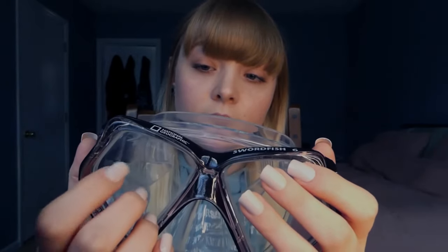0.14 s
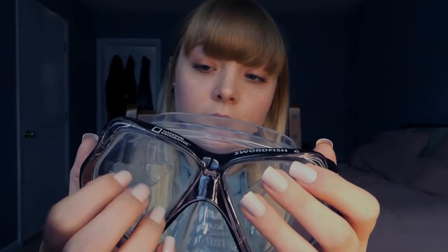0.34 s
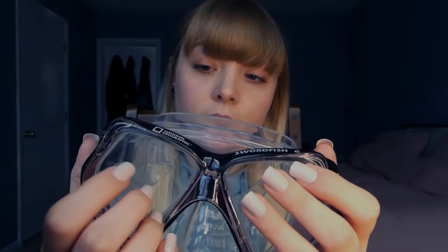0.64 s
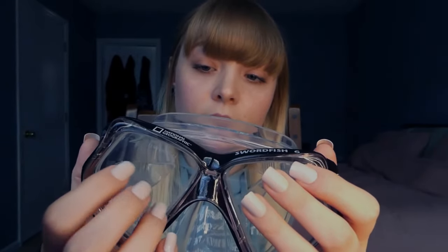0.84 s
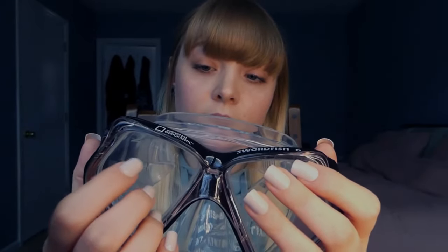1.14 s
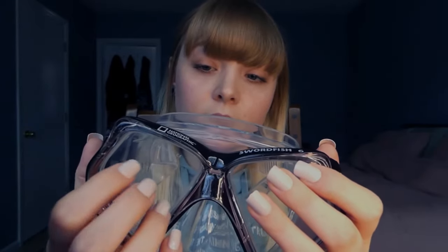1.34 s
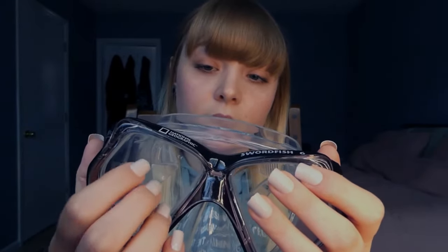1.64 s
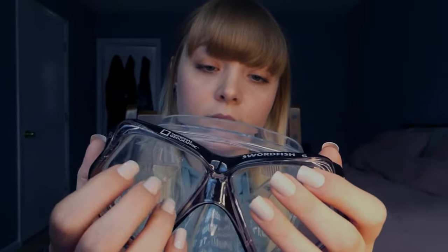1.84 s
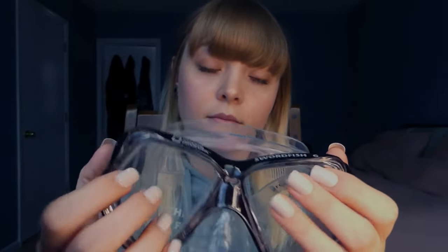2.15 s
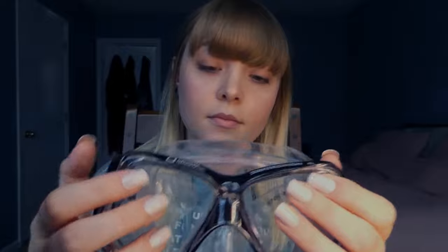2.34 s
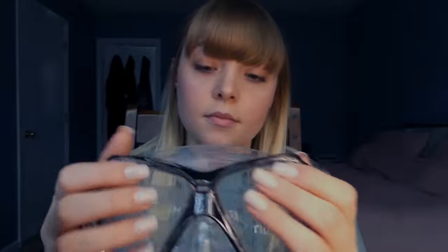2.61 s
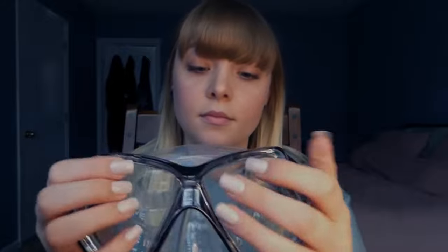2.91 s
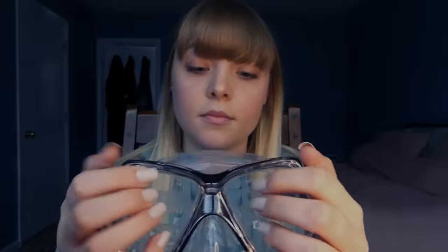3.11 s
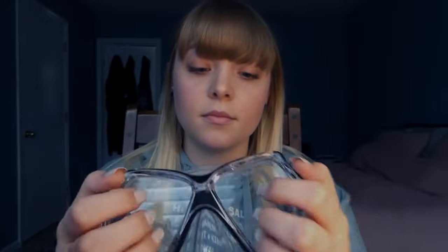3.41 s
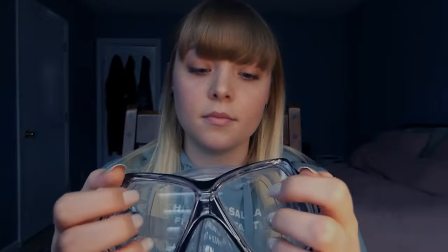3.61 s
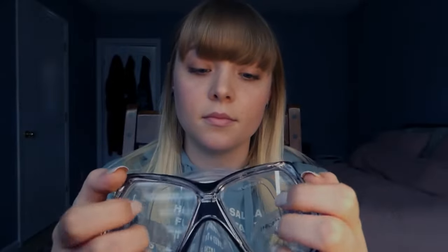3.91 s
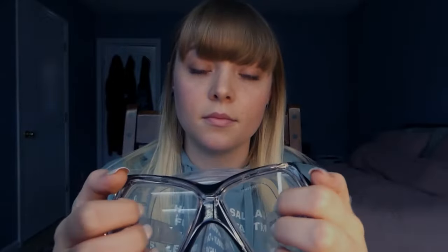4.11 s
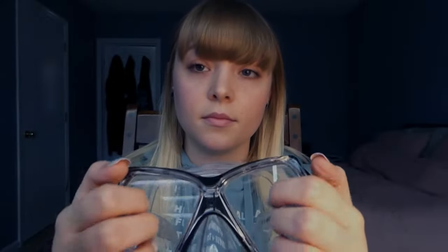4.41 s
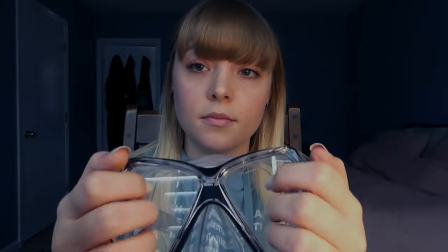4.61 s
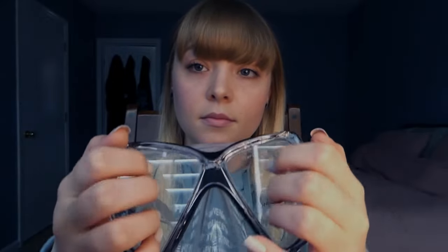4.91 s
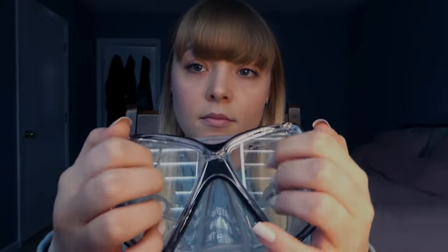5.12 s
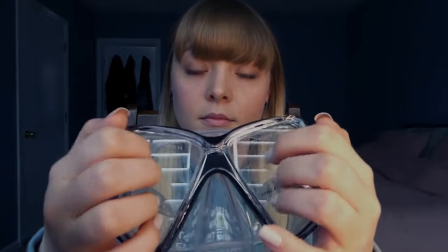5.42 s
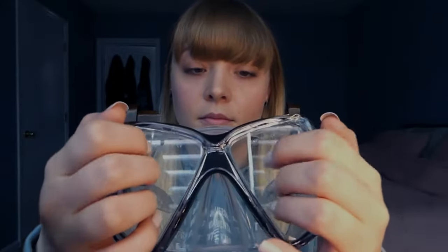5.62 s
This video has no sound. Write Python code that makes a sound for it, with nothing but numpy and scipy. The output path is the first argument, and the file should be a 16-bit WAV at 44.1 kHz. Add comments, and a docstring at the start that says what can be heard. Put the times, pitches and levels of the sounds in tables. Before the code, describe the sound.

Long fingernails tap in quick runs on a plastic diving mask, very close, with a brief rubbing change of grip midway.

```python
"""Long fingernails tap in fast runs on a diving mask, very close to a microphone in a small room.
0-2 s: taps on lenses and rim; each thumps the mask, rings its frame and lens and clicks the nail.
2.1-3.6 s: the hands slide to a new grip; skin and nails rub the plastic, with soft bumps and stray taps.
3.8-5.7 s: denser runs from curled fingers, the mask damped by the palms.
Throughout: faint room tone; the sharpest taps overload the microphone."""
import sys
import numpy as np
from scipy import signal
from scipy.fft import rfft, irfft, next_fast_len
from scipy.io import wavfile

SR = 44100
rng = np.random.default_rng(int(sys.argv[2]) if len(sys.argv) > 2 else 0)


def master_out(mix):
    """Clip the mix to full scale and print it as 16-bit PCM to the path in sys.argv[1]."""
    frames = np.transpose(np.atleast_2d(mix))
    ceiling = np.clip(frames, -1, 1)
    pcm = np.round(ceiling * 32767).astype(np.int16)
    wavfile.write(sys.argv[1], SR, pcm)


N = 253575

# nail taps: (time [s], strength [dB], touch)
NAIL_TAPS = [(0.0193, 0, "flat on lens"), (0.1402, 0, "slanted on lens"), (0.2529, -3, "tip on rim"),
             (0.5331, -0.5, "flat on lens"), (0.6271, 0, "slanted on lens"), (0.7268, 1.5, "tip on rim"),
             (0.9913, -1, "flat on lens"), (1.09, 3, "slanted on lens"), (1.2264, -4.5, "curled on rim"),
             (1.4596, -3, "flat on lens"), (1.5449, 1.5, "steep on lens"), (1.6217, 0, "tip on rim"),
             (1.8975, -4, "flat on lens"), (1.9564, -3, "steep on lens"), (2.182, -15.5, "nail snap"),
             (2.404, -29.5, "side of frame"), (2.697, -22, "side of frame"), (2.7479, 0.5, "side of frame"),
             (2.964, -23.5, "side of frame"), (3.1115, -9, "side of frame"), (3.1298, -7, "side of frame"),
             (3.133, 2, "nail snap"), (3.2464, -7, "nail snap"), (3.409, -19, "side of frame"),
             (3.4233, -8, "side of frame"), (3.8397, -5, "curled on lens"), (4.231, 1, "curled on lens"),
             (4.2842, -4, "glancing"), (4.342, -1, "curled on edge"), (4.35, -4, "glancing"),
             (4.4053, 2, "curled tip"), (4.4301, 2, "curled on rim"), (4.6204, 0, "curled on lens"),
             (4.6374, -1.5, "glancing"), (4.6748, 1.5, "curled on edge"), (4.726, 1, "curled tip"),
             (4.7586, 0, "curled on rim"), (4.9265, -4.5, "glancing"), (4.9422, 1.5, "curled on lens"),
             (4.9565, -4.5, "glancing"), (5.0058, 1.5, "curled on edge"), (5.0489, -1.5, "curled tip"),
             (5.0979, 1.5, "curled on rim"), (5.2486, -1.5, "curled on lens"), (5.2722, -2, "glancing"),
             (5.31, 2, "curled on edge"), (5.3631, 1.5, "curled tip"), (5.4051, 2, "curled on rim"),
             (5.542, -7, "glancing"), (5.5665, 1, "curled on lens"), (5.6159, 2.5, "curled on edge"),
             (5.6542, 0.5, "curled tip"), (5.7088, -7, "curled on rim")]
# drive of each part, by touch: (thump [dB], knock [dB], frame [dB], lens [dB], nail [dB])
TOUCH_DRIVE_DB = {"flat on lens": (-8.5, -17, -18, -11.5, -31),
                  "slanted on lens": (-10.5, -20.5, -18.5, -12.5, -17.5),
                  "steep on lens": (-12.5, -27, -18, -14, -4.5), "tip on rim": (-16, -23.5, -16.5, -23, 0),
                  "side of frame": (-24.5, -59, -9.5, -23.5, -20), "nail snap": (-44, -47, -37, -28, -6.5),
                  "curled on lens": (-15.5, -24, -18.5, -14, -19), "glancing": (-15, -17, -21, -29.5, -18),
                  "curled on edge": (-15, -17.5, -16.5, -18, -26.5),
                  "curled tip": (-22, -22.5, -24, -26.5, 2), "curled on rim": (-14, -20, -15, -22, -17.5)}
# modes: (frequency [Hz], relative level [dB], t60 [s])
THUMP_MODES = [(61, -20, 0.2), (134, 5.5, 0.0064), (127, -4.5, 0.059), (163, -24, 0.21), (223, -33.5, 0.22)]  # whole mask on its soft skirt
KNOCK_MODES = [(415, 0.5, 0.019), (1656, 10, 0.0042), (2070, -5, 0.0084)]  # hollow behind the lenses
FRAME_MODES = [(1084, -6.5, 0.025), (1251, 7, 0.0089), (1250, -33, 0.17), (1506, -4.5, 0.0042),
               (1760, -11, 0.02)]
LENS_MODES = [(2670, -6, 0.015), (2973, 7.5, 0.0057), (3416, -1, 0.014), (3665, 1, 0.0088),
              (4230, -14.5, 0.011), (5067, -5.5, 0.011), (4920, -35, 0.012)]
NAIL_MODES = [(6300, 0, 0.0014), (6740, -5.5, 0.0036), (7310, -4.5, 0.0022), (9900, -35, 0.0035),
              (9900, -2, 0.0015), (13000, -43, 0.0035)]
SWAY_MODES = [(83.8, 7.5, 0.12), (38.3, -8.5, 0.86)]  # mask rocking in the hands
# finger slides: (start [s], length [s], relative rub [dB], relative scrape [dB])
FINGER_STROKES = [(2.152, 0.022, -47, -50), (2.603, 0.022, -35, -30.5), (2.756, 0.065, -38.5, -50),
                  (2.84, 0.066, -46, -47), (2.95, 0.082, -43, -54), (3.02, .045, -32.5, -33.5),
                  (3.096, .03, -25.5, -21), (3.239, 0.053, -37.5, -54), (3.301, 0.041, -34.5, -39),
                  (3.394, 0.036, -42, -33.5), (3.494, .06, -46, -53)]
# finger pads landing: (time [s], strength [dB])
PAD_BUMPS = [(2.177, -33), (2.636, -32.5), (2.768, -24.5), (2.974, -28.5), (3.031, -36), (3.328, -32),
             (3.39, -25), (3.463, -26.5)]
# noise spectra: (frequency [Hz], relative density [dB])
SKIN_SPECTRUM = [(240, -51), (400, -1.5), (481, 6.5), (666, -15), (1060, -6), (1820, 3.5), (2470, 1),
                 (3260, 2), (5870, -2), (7990, -1.5), (10400, -10), (14600, -8), (16000, -31)]
HANDLING_SPECTRUM = [(20, -0.5), (45, 0.5), (90, -3), (180, -5.5), (400, -16.5), (900, -25), (2000, -57)]
ROOM_TONE_SPECTRUM = [(12, -29), (20, -3), (74, -2), (93, -7.5), (310, -18), (399, -21.5), (434, -18),
                      (738, -26.5), (923, -23), (1570, -27.5), (1860, -27.5), (3950, -30), (5230, -30),
                      (16000, -33)]
# room decay: (frequency [Hz], t60 [s])
ROOM_DECAY = [(150, 0.46), (1200, 0.36), (7000, 0.3), (14000, 0.21)]


def taps(regrip_s=3.0, grip_t60_s=0.042, click_db_per_db=3.14):
    """Each nail pushes the mask, rings its parts and clicks; firmer taps are brighter."""
    out, t = np.zeros(N), np.arange(SR // 7) / SR
    t_short = t[:SR // 50]
    grit = coloured(rng.standard_normal(N), [(2000, 3), (8000, 0.5), (11800, -4.5), (15000, -3.5),
                                             (17000, -43)])
    for time_s, db, touch in NAIL_TAPS:
        drive_db = np.add(TOUCH_DRIVE_DB[touch], [db, db, db, db, click_db_per_db * db])
        thump_db, knock_db, frame_db, lens_db, nail_db = drive_db
        cupped = time_s > regrip_s
        tap = amp(thump_db) * mask_thump(t, cupped, grip_t60_s)
        frame = amp(frame_db) * ring(FRAME_MODES, t)
        if cupped:  # gripping fingers mute the frame
            frame *= amp(-2) * fade(t, grip_t60_s)
        tap += frame
        add(tap, 0, amp(knock_db) * ring(KNOCK_MODES, t_short))
        add(tap, 0, amp(lens_db) * ring(LENS_MODES, t_short))
        add(tap, 0, nail_click(t_short, nail_db, grit[round(time_s * SR):], curled=cupped))
        tap *= rise(t, 0.000065)
        add(out, time_s, in_room(tap, near_db=-16, near_t60_s=0.0081, room_db=-21.5))
    return out


def mask_thump(t, cupped, grip_t60_s, loaded_ratio=0.93, sway_db=-22):
    """The mask bounces on its skirt; cupped palms add mass, damp it and rock with it."""
    if not cupped:
        return ring(THUMP_MODES, t)
    damped = ring(THUMP_MODES, t * loaded_ratio) * fade(t, grip_t60_s)
    return damped + amp(sway_db) * ring(SWAY_MODES, t, wave=np.sin)


def nail_click(t, drive_db, grit, curled, steep_ratio=1.054):
    """Nail ring plus a noise crack; curled fingers land steeper and ring higher."""
    nail = amp(drive_db) * ring(NAIL_MODES, t * (steep_ratio if curled else 1), wave=np.sin)
    crack_db = 0.47 * drive_db - 3.5
    crack = amp(crack_db) * grit[:len(t)] * fade(t, 0.0062)
    return rise(t, 0.0001) * (nail + crack)


def bumps():
    """Finger pads land on the mask: a slow push, no click."""
    out, t = np.zeros(N), np.arange(SR // 5) / SR
    for time_s, db in PAD_BUMPS:
        add(out, time_s, -amp(db) * ring(SWAY_MODES, t, wave=np.sin))
    return out


def finger_friction(attack_s=0.01, release_t60_s=0.16):
    """Short strokes: skin hisses over the plastic, nails catch on the frame."""
    rub, scrape, t = np.zeros(N), np.zeros(N), np.arange(SR // 2) / SR
    for start_s, length_s, rub_db, scrape_db in FINGER_STROKES:
        speed = rise(t, attack_s) * fade(np.maximum(t - length_s, 0), release_t60_s)
        add(rub, start_s, amp(rub_db) * speed)
        add(scrape, start_s, amp(scrape_db) * speed)
    skin = coloured(slips(rate_hz=5000, spread_db=-0.5), SKIN_SPECTRUM)
    catches = slips(rate_hz=450, spread_db=5.5)
    frame = signal.fftconvolve(catches, ring(FRAME_MODES, t[:SR // 8]))[:N]
    # little bass: the catches sound mostly between 1 and 2 kHz
    nails = coloured(frame, [(500, -26), (1000, 14.5), (2200, 6.5), (5000, -21)])
    friction = rub * skin + amp(-3) * scrape * nails
    return in_room(friction, near_db=-7.5, near_t60_s=0.009, room_db=-12)


def slips(rate_hz, spread_db):
    """Stick-slip impulses, random in time and size."""
    hits = rng.random(N) < rate_hz / SR
    return hits * rng.standard_normal(N) * amp(spread_db * rng.standard_normal(N))


def handling_rumble(centre_s=2.973, width_s=0.76, level_db=-37.5):
    """The mask rumbles in the hands, swelling and ebbing around the change of grip."""
    swell = np.exp(-((np.arange(N) / SR - centre_s) / width_s) ** 2)
    return amp(level_db) * swell * coloured(rng.standard_normal(N), HANDLING_SPECTRUM)


def in_room(x, near_db, near_t60_s, room_db):
    """Direct sound, quick scatter off hands and mask, faint room tail."""
    hz, frames_s, noise = signal.stft(rng.standard_normal(SR // 6), SR, nperseg=256)
    decay = fade(frames_s, along(ROOM_DECAY, hz)[:, None])
    tail = signal.istft(noise * decay, SR, nperseg=256)[1]
    t = np.arange(len(tail)) / SR
    tail *= rise(t, 0.0016)  # the walls answer later
    near = rng.standard_normal(len(t)) * fade(t, near_t60_s) * rise(t, 0.0014)
    response = amp(near_db) * near / np.linalg.norm(near) + amp(room_db) * tail / np.linalg.norm(tail)
    return x + signal.fftconvolve(x, response)[:len(x)]


def room_tone(rms_db=-41.5):
    """Steady low rumble under microphone hiss."""
    return amp(rms_db) * coloured(rng.standard_normal(N), ROOM_TONE_SPECTRUM)


def ring(modes, t, wave=np.cos, spread_db=1.3, detune=0.012):
    """Damped modes; level and pitch vary with the spot struck."""
    hz, db, t60_s = np.transpose(modes)[:, :, None]
    size, shift = rng.standard_normal((2, len(modes), 1))
    envelopes = amp(db + spread_db * size) * fade(t, t60_s)
    return np.sum(envelopes * wave(2 * np.pi * hz * (1 + detune * shift) * t), axis=0)


def rise(t, tau_s):
    """Exponential rise to 1."""
    return 1 - np.exp(-t / tau_s)


def fade(t, t60_s):
    """Decay of 60 dB per t60_s."""
    return np.exp(-np.log(1000) * t / t60_s)


def amp(db):
    """dB to gain."""
    return 10 ** (np.asarray(db) / 20)


def along(points, hz):
    """Interpolate (frequency [Hz], value) on a log axis."""
    points_hz, values = np.transpose(points)
    return np.interp(np.log(hz + 1), np.log(points_hz + 1), values)


def filtered(x, response):
    """Apply response(hz) by FFT."""
    size = next_fast_len(len(x) + SR // 2)
    return irfft(rfft(x, size) * response(np.fft.rfftfreq(size, 1 / SR)), size)[:len(x)]


def coloured(x, spectrum):
    """Shape by (frequency [Hz], level [dB]); scale to rms 1."""
    x = filtered(x, lambda hz: amp(along(spectrum, hz)))
    return x / np.sqrt(np.mean(x ** 2) + 1e-20)


def add(track, start_s, sound):
    """Mix sound into track at start_s."""
    part = track[round(start_s * SR):][:len(sound)]
    part += sound[:len(part)]


def scene():
    """Taps, change of grip and room tone; mono."""
    return (taps() + bumps() + finger_friction() + handling_rumble() + room_tone())[None]


def record(dry, ceiling=0.7, hardness=4, notch_hz=5900, notch_width_hz=170, top_hz=16000):
    """Microphone overload rounds the peaks; then a narrow notch and a band limit."""
    def response(hz):
        offset = notch_hz ** 2 - hz ** 2
        notch = offset / (offset + 1j * hz * notch_width_hz)
        return notch * np.clip((top_hz - hz) / 400 + 0.5, 0, 1)

    clipped = dry[0] / (1 + np.abs(dry[0] / ceiling) ** hardness) ** (1 / hardness)
    return filtered(clipped, response)[None]


dry = scene()
out = record(dry)
master_out(out)
```